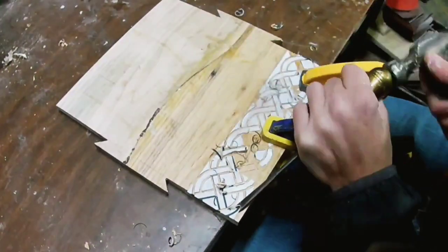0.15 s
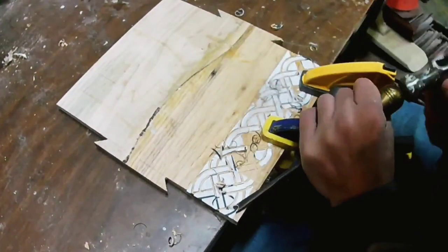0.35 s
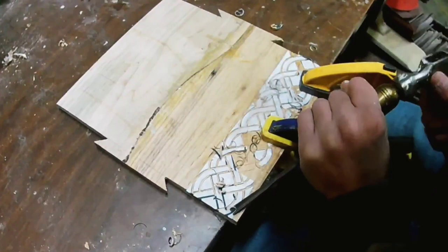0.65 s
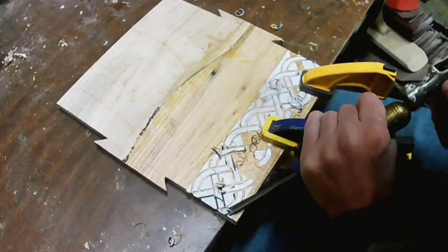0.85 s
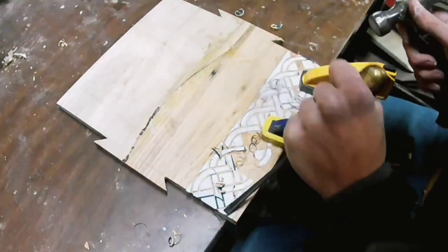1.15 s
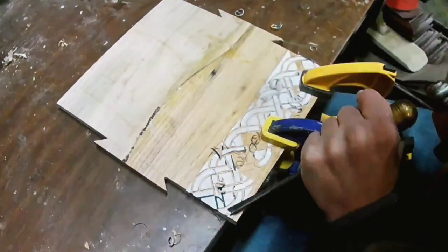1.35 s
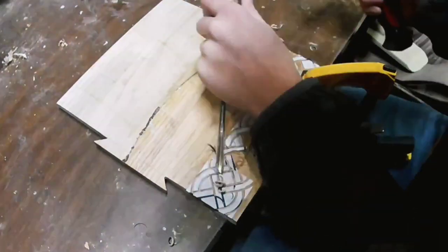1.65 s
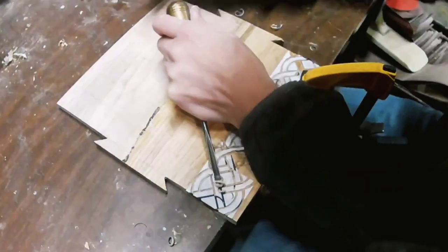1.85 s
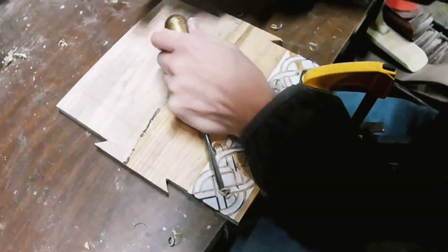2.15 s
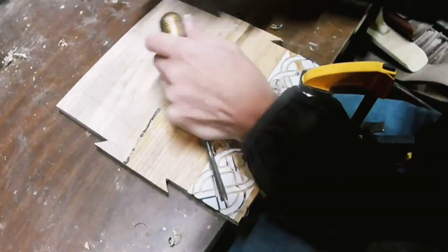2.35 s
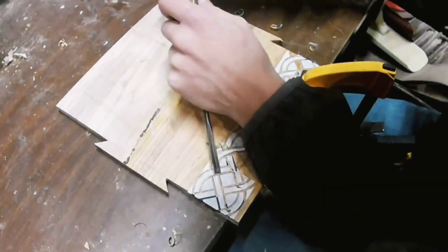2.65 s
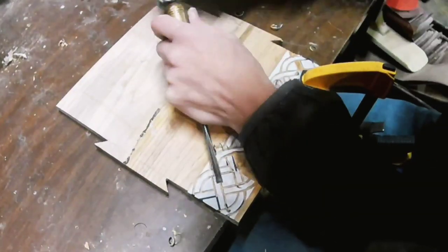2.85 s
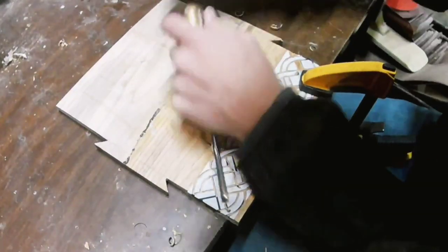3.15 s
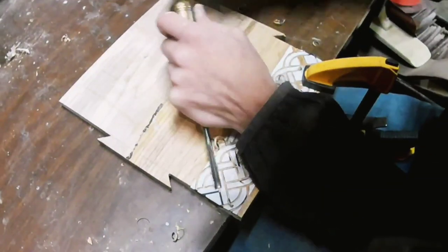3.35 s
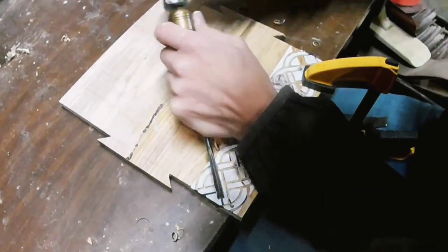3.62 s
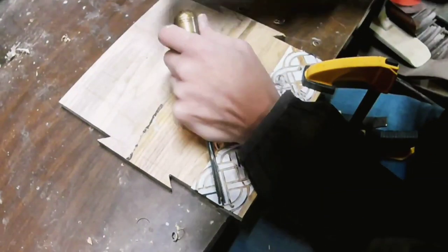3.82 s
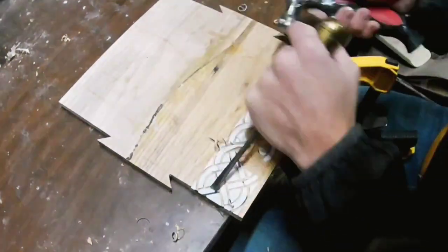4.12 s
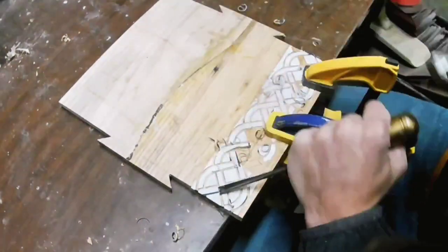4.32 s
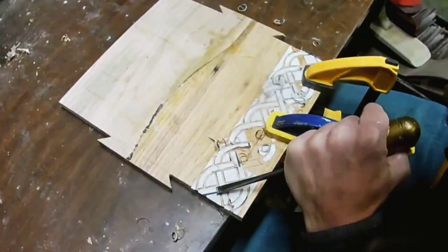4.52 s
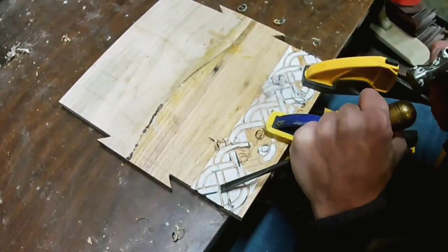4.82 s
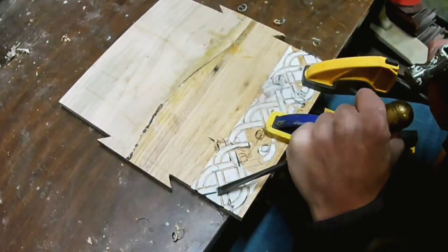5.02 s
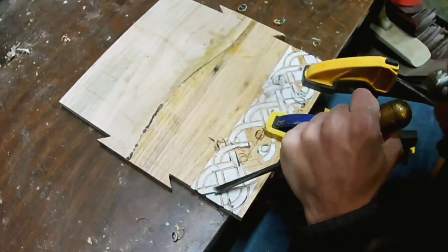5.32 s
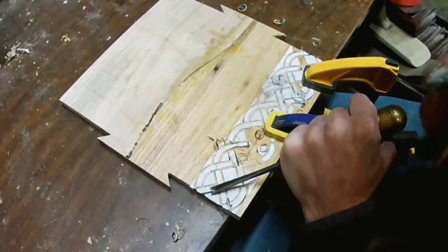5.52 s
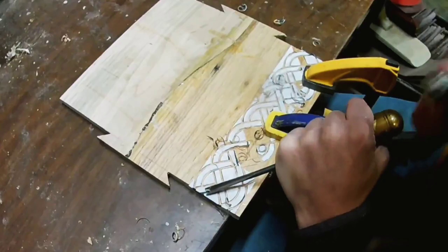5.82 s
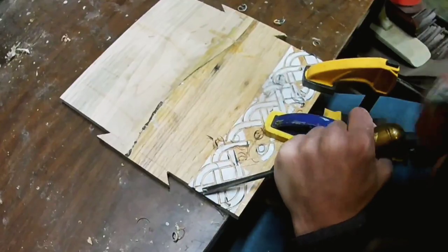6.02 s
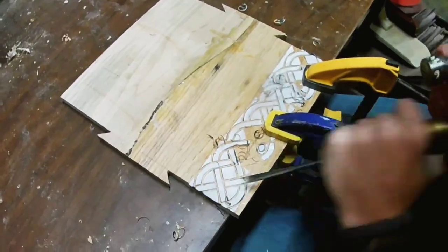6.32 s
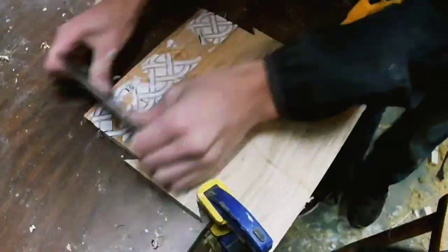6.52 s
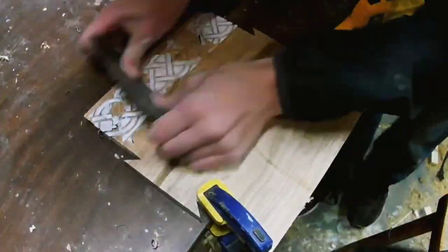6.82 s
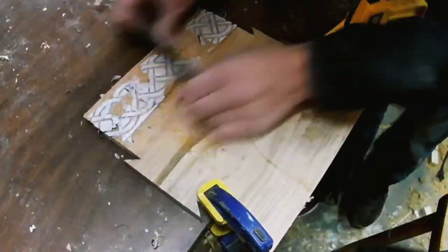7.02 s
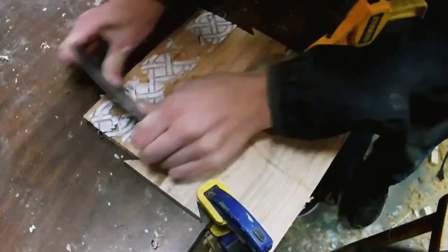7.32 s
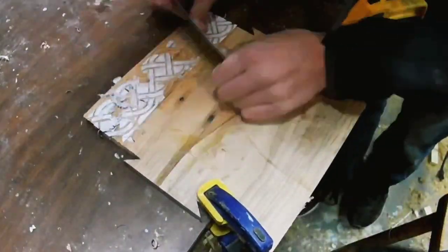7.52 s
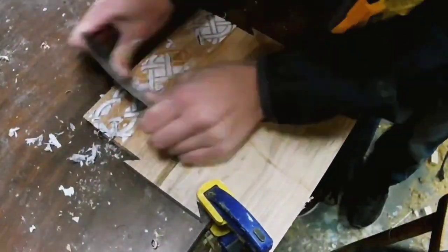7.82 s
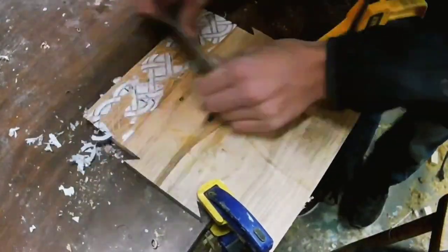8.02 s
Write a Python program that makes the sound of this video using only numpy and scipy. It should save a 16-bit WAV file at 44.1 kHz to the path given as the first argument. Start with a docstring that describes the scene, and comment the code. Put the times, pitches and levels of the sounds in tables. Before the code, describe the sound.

Dry, quiet wood carving recorded close and nearly mono. Clusters of irregular chisel taps knock and scratch at a wooden board, some barely audible, others sharp, with low thuds from the bench. Short gaps leave only dull room air. Later the tapping gives way to evenly repeated gouge pushes, each a crunchy bite followed by a thin, hissy rasp and crackling shaving. One huge blunt pop of air overloads the microphone before a few weak scrapes.

```python
"""Carving a board on a workbench

A hammer drives a chisel in quick runs of taps: the board clacks, the steel edge crunches, the bench booms. Then
a gouge is pushed by hand, biting and scraping, and a puff of air thumps the microphone. Bursts of snapping
fibres ring the resonances of board and edge; the bench is struck or rubbed. A faint room tail and steady air
noise surround the work."""
import sys
import numpy as np
from scipy import signal
from scipy.fft import rfft, irfft
from scipy.io import wavfile

SR = 44100
rng = np.random.default_rng(int(sys.argv[2]) if len(sys.argv) > 2 else 0)


def wav_record(signal):
    """Record a signal, one row per channel, as 16-bit PCM in the file named by sys.argv[1]."""
    frames = np.transpose(np.atleast_2d(signal))
    bounded = np.clip(frames, -1, 1)
    # unit amplitude maps onto the largest positive 16-bit level
    quanta = np.round(bounded * 32767).astype(np.int16)
    wavfile.write(sys.argv[1], SR, quanta)


N = 360297

# Hammer taps on the chisel: start_s, level_db (of the board's clack), cut_length_s
TAPS = [(0.015, -30, 0.0088), (0.047, -36, 0.0072), (0.074, -42.5, .008), (0.098, -31, 0.0052),
        (0.308, -29.5, 0.0048), (0.323, -44.5, .009), (0.377, -36.5, 0.0087), (0.448, -25, 0.0049),
        (0.482, -34.5, 0.0087), (0.539, -49, 0.0063), (0.578, -39, 0.016), (0.623, -32, 0.02),
        (0.673, -39, 0.022), (0.697, -31.5, 0.01), (0.726, -26.5, 0.0086), (0.76, -32, .007),
        (0.787, -39.5, .02), (0.891, -30.5, 0.0085), (0.929, -37, .008), (0.976, -29, .021),
        (1.026, -21, 0.0086), (1.097, -29.5, 0.0069), (1.251, -61.5, .01), (1.278, -51.5, 0.0074),
        (1.349, -56, 0.0028), (1.461, -39, 0.013), (1.483, -39.5, 0.0088), (1.511, -27, 0.021),
        (1.576, -40, 0.0054), (1.598, -38.5, 0.015), (1.955, -40, .008), (1.993, -36, 0.005),
        (2.097, -31.5, 0.0033), (2.13, -39.5, 0.009), (2.233, -41.5, 0.012), (2.271, -46, 0.0038),
        (2.396, -34, 0.012), (2.43, -40.5, 0.0048), (2.489, -40.5, 0.012), (2.53, -30, 0.012),
        (2.617, -30, 0.0059), (2.876, -42, 0.012), (2.978, -34.5, .008), (3.014, -43.5, 0.0097),
        (3.111, -32, 0.016), (3.165, -26.5, 0.0099), (3.215, -32, 0.0072), (3.256, -35, 0.0033),
        (3.321, -49.5, 0.011), (3.461, -36, 0.0098), (3.517, -29.5, 0.0087), (3.579, -35.5, 0.0062),
        (3.646, -39.5, 0.013), (3.69, -28, 0.012), (3.739, -26, 0.011), (3.801, -35, 0.013),
        (3.855, -23.5, 0.012), (3.899, -30, 0.017), (3.947, -24, .01), (4.031, -45, 0.019),
        (4.111, -25, 0.013), (4.221, -54.5, 0.019), (4.285, -55, .016), (4.489, -47, 0.016),
        (4.552, -38.5, .002), (4.6, -28.5, 0.011), (4.672, -28.5, 0.0059), (4.788, -56.5, 0.013),
        (5.184, -44.5, 0.0098), (5.35, -30, 0.0063), (5.398, -23, 0.005), (5.452, -32, .018),
        (5.512, -32.5, 0.014), (5.57, -31.5, .013), (5.618, -27.5, .018), (5.672, -22, 0.0078),
        (5.718, -19.5, 0.0065), (5.781, -29.5, 0.0045), (5.825, -29.5, 0.012), (5.901, -24.5, .013),
        (5.961, -27, 0.0097), (6.017, -26.5, 0.013), (6.07, -32, 0.016), (6.133, -24.5, 0.0069),
        (6.181, -27, 0.0095), (6.238, -30, 0.0038), (6.404, -55.5, 0.023)]
# Resonances of the clamped board: pitch_hz, width_hz, level_db (relative)
BOARD = [(407, 62, -26), (541.5, 122, -15.5), (780.5, 160, -13.5), (976.3, 120, -7), (1267.4, 115.7, 4),
         (1420, 220, -10), (1537, 120, -8), (1692, 430, -22), (1972, 120, -14.5), (2100, 420, -22.5),
         (2616, 140, -31.5)]
# Resonances of the steel edge in the fibres: pitch_hz, width_hz, level_db (relative)
EDGE = [(3246, 240, 1), (3490, 780, -3.5), (3730, 370, 2), (4450, 53, -7.5), (4470, 110, -12.5),
        (5265, 660, -18.5), (5870, 170, -21), (6400, 380, -28), (6700, 330, -30)]
# Resonances of the bench top: pitch_hz, width_hz, level_db (relative)
BENCH = [(55, 43, -28.5), (95.3, 26, 6.5), (130, 56, -6.5), (225, 64, -18.5), (345, 84, -21.5),
         (510, 130, -19.5)]
# Tone of the gouge's shallow slicing, added to the resonances: pitch_hz, change_db
SLICING = [(200, 14.5), (530, -5.5), (970, -1.5), (1270, -1.5), (1500, -1.5), (1700, 13), (2000, 0),
           (2700, 1.5), (3700, 8.5), (4300, 6.5), (5300, 3.5), (6400, -1), (10000, 5)]
# Tone of the workshop air: pitch_hz, level_db (relative, per Hz)
AIR = [(15, -43), (25, -7.5), (71, 0), (169, -6), (349, -8), (389, -11), (582, -16), (804, -17),
       (2490, -25), (2850, -28), (3930, -28), (5140, -34), (15500, -42.5)]
# How alike the air is on the left and right: pitch_hz, likeness (0 to 1)
AIR_LIKENESS = [(100, 1), (1500, 0.99), (4000, 1), (10000, 0.1)]
# Difference between the two microphone ports: pitch_hz, side_over_mid_db
PORTS = [(100, -41), (500, -35), (1300, -47.5), (2000, -35.5), (3700, -35.5), (6000, -10), (12000, -8)]
# Resonances of the shaving curling off the gouge: pitch_hz, width_hz, level_db (relative)
SHAVING = [(1794, 190, 20), (4214, 140, 20), (5280, 1400, 0.5), (5700, 210, -10), (6070, 300, 0.5),
           (6810, 210, -10)]
# Runs of hammering: start_s, end_s, chisel_pressure_db, low_mode_lift_db, slips_per_s
RUNS = [(-0.05, 0.113, -2, 0.5, 2), (0.247, 0.85, -1, 3.5, 12), (0.886, 1.109, -3.5, -4, 5),
        (1.424, 1.614, -8, -1.5, 10), (1.89, 2.649, 1, 1.5, 12), (2.874, 3.258, -2, -4.5, 7),
        (3.473, 4.018, 8, 0, 0.5), (4.485, 4.727, -9, -3.5, 0), (5.347, 6.281, 1.5, -1.5, 1.5)]
# Gouge strokes, a bite and then a slide: start_s, bite_level_db, bite_length_s, slide_level_db
STROKES = [(6.58, -32, 0.0077, -37), (6.761, -34, .007, -43), (6.923, -36, .016, -39.5),
           (7.043, -32, 0.021, -40.5), (7.164, -27.5, 0.024, -38), (7.288, -26.5, 0.022, -38),
           (7.412, -18, 0.02, -38), (7.532, -26.5, 0.019, -39.5), (7.645, -28, 0.019, -39.5),
           (7.788, -48, 0.023, -48), (7.923, -44, 0.0095, -50.5), (8.06, -40.5, 0.00414, -50)]
# Chips snapping off: start_s, level_db (of the board's part)
CHIPS = [(2.328, -43.5), (2.399, -34.5), (2.431, -37.5), (3.582, -35.5), (6.606, -40), (6.811, -36.5),
         (7.481, -31)]
# A tool resting on the wood damps the main ring and brings out the rest: pitch_hz, change_db
RESTING_TOOL = [(250, -0.5), (550, 7.5), (950, 1.5), (1255, -3.5), (1550, -2), (2050, 4), (3700, -2),
                (5500, 4.5)]
# The sliding gouge sounds thinner and hissier than its bite: pitch_hz, change_db
SLIDING_GOUGE = [(200, 15.5), (530, -3.5), (950, -4.5), (1270, -3), (1500, -6.5), (1750, 1), (2100, 3),
                 (2700, 1.5), (3700, 16.5), (4300, 8), (5300, 7), (6400, -2), (10000, 11)]

RING = 8192  # samples in one short sound
RING_HZ = np.fft.rfftfreq(RING, 1 / SR)
RING_S = np.arange(RING) / SR
TIME = np.arange(N) / SR
CUTOFF_HZ, AIR_DB, ROOM_T60_S, PUFF_S = 15800, -67, .2, 7.7488

# The hand leans in as a run starts and eases off as it ends; between runs the chisel only rests
LEAN_IN_S, EASE_OFF_S, EASED_DB, RESTING_DB = 0.054, 0.013, 12.5, -22
# Pressure makes the chisel rub louder
RUB_DB, RUB_PER_DB = -55, 0.59
SLIP_DB, SLIP_SPREAD_DB, SLIP_S = -43.5, 2.5, .01
LOW_MODES_HZ = 1090
# Pressure drives the edge through more fibres; a glancing tap scratches more for its weight than a square one
CRUNCH_DB, CRUNCH_PER_DB, SQUARE_TAP_DB, GLANCING_SHARE = -24.5, 0.41, -30, .15
BOOM_DB = -40  # bench boom before pressure is added
# A long cut takes longer to reach its full force
SINK_S, SINK_PER_LENGTH = 0.0019, 0.09

# A louder bite is a deeper one and lifts the low modes
BITE_CRUNCH_DB, SHALLOW_BITE_DB, DEPTH_PER_DB = -26.5, -24.5, 1
# The slide begins after so many bite lengths and lasts until the stroke ends; the hands settle near that end
SLIDE_AFTER_BITES, STROKE_S, SETTLE_S, SETTLE_DB = 1.72, 0.085, 0.081, -8
# The gouge's back rubs the wood from the bite on, this far under the slide
BACK_RUB_S, BACK_RUB_DB = .12, -11


def from_db(db):
    """Turn decibels into a gain."""
    return 10 ** (np.asarray(db) / 20)


def rms_one(x):
    """Scale a sound to an average strength (rms) of 1."""
    return x / np.sqrt(np.mean(x ** 2) + 1e-20)


def burst(x, db, span):
    """Scale a short sound so that its energy, spread over span seconds, has this level."""
    return from_db(db) * x / np.sqrt(np.sum(x ** 2) / (span * SR) + 1e-20)


def at_hz(points, hz):
    """Read a table between its points, on a log-frequency axis."""
    f, value = np.transpose(points)
    return np.interp(np.log(hz + 1), np.log(f), value)


def add(out, s, x):
    """Mix x into out from time s on."""
    i = max(round(s * SR), 0)
    out[i:i + len(x)] += x[:N - i]


def both_sides(side):
    """Give the left the side signal and the right its mirror image."""
    return side * np.array([[1], [-1]])


def body(modes, vary_db=0, colour_db=0):
    """Make the ring of an object from its resonances; each contact may weight them a little differently."""
    hz, width, db = np.transpose(modes)[:, :, None]
    weights = from_db(db + vary_db * rng.standard_normal(db.shape))
    peaks = weights / (1 + (2 * (RING_HZ - hz) / width) ** 2)
    gain = np.sqrt(np.sum(peaks ** 2, axis=0)) * from_db(colour_db)
    cepstrum = irfft(np.log(gain + 1e-9))
    cepstrum[1:RING // 2] *= 2  # folding the cepstrum gives minimum phase: the ring starts at once
    cepstrum[RING // 2 + 1:] = 0
    return irfft(np.exp(rfft(cepstrum)))


def excite(force, response):
    """Let a force ring through an object's response (convolution)."""
    return signal.fftconvolve(force, response)[:len(force)]


def fibres(per_s, spread_db, size):
    """Snap wood fibres at random moments with uneven strengths; rms 1."""
    snaps = rng.random(size) < per_s / SR
    signs = rng.choice([-1, 1], size)
    return rms_one(snaps * signs * from_db(spread_db * rng.standard_normal(size)))


def cut_force(length, tearing, firm_s):
    """A first contact, then fibres tearing while the edge advances; a longer cut tears more."""
    length = max(length, .002)
    tear = fibres(per_s=5000, spread_db=0.5, size=RING) * np.exp(-(RING_S / length) ** 4)
    tear = tear / np.sqrt(np.sum(tear ** 2) + 1e-20)
    force = tear * tearing * (length / firm_s) ** 2
    force[0] += 1
    return force


def swell(rise_s):
    """The edge sinks in over a moment instead of striking at once."""
    return 1 - np.exp(-(RING_S / rise_s) ** 3)


def around_cut(response, db, length, linger_s):
    """Loose fibres rustle around a cut: noise swells and fades through a response."""
    rustle = rng.standard_normal(RING) * RING_S * np.exp(-(RING_S / (length + linger_s)) ** 2)
    return burst(excite(rustle, response), db, span=0.054)


def splinters(db, length, spray_hz=11000, spray_width_hz=14000):
    """A bright spray of fine splinters: noise through one very broad, high resonance."""
    return around_cut(body([(spray_hz, spray_width_hz, 0)]), db, length, linger_s=0.014)


def sliding(strokes, colour_db, edge_db, boom_db, ramp_s, judder_db, judder_per_s, snaps_per_s):
    """Steel dragged over wood: dense fibre snaps under a juddering pressure ring board, edge and bench."""
    pressure = 0
    for start, end, db in strokes:
        inside_s = np.minimum(TIME - start, end - TIME)
        ease = np.sin(np.pi / 2 * np.clip(inside_s / ramp_s + .5, 0, 1)) ** 2
        pressure = pressure + from_db(db) * ease
    judder = np.interp(TIME * judder_per_s, np.arange(4096), rng.standard_normal(4096))
    force = fibres(per_s=snaps_per_s, spread_db=5.5, size=N) * from_db(judder_db * judder)
    parts = [(BOARD, 0), (EDGE, edge_db), (BENCH, boom_db)]
    response = sum(burst(body(modes, colour_db=colour_db), db, span=1 / SR) for modes, db in parts)
    return excite(rms_one(force) * pressure, response)


def air():
    """Steady dull room noise with a faint hiss: shaped noise, partly shared by left and right."""
    hz = np.fft.rfftfreq(N, 1 / SR)
    alike = np.clip(at_hz(AIR_LIKENESS, hz), 0, 1)
    mid, side = rfft(rng.standard_normal((2, N))) * from_db(at_hz(AIR, hz))
    spectrum = np.sqrt(1 + alike) * mid + both_sides(np.sqrt(1 - alike) * side)
    return from_db(AIR_DB) * rms_one(irfft(spectrum, N))


def pressure_db(s):
    """How hard the chisel is pressed into its groove at time s."""
    def eased(inside_s, ramp_s):
        return EASED_DB * np.exp(min(-inside_s / ramp_s, 2))

    pressed = [db - eased(s - start, LEAN_IN_S) - eased(end - s, EASE_OFF_S)
               for start, end, db, _, _ in RUNS]
    return max(RESTING_DB, *pressed)


def low_lift_db(s):
    """Each run cuts at another spot and angle, stirring the board's low modes more or less."""
    start, end, _, lift_db, _ = np.transpose(RUNS)
    nearest = np.argmin(np.maximum(start - s, s - end))
    return lift_db[nearest] / (1 + (RING_HZ / LOW_MODES_HZ) ** 12)


def chisel_rubs():
    """The chisel rubs in its groove all through a run, louder under pressure."""
    runs = [(start, end, RUB_DB + RUB_PER_DB * db) for start, end, db, _, _ in RUNS]
    return sliding(runs, at_hz(RESTING_TOOL, RING_HZ), edge_db=-14.5, boom_db=2, ramp_s=.02,
                   judder_db=4.0, judder_per_s=78, snaps_per_s=2400)


def slips():
    """Within a run the edge also slips on through the grain in weak, irregular jerks: rows like TAPS."""
    rows = []
    for start, end, _, _, per_s in RUNS:
        slots = max(round((end - start) * per_s), 0)
        for k, (place, strength) in enumerate(rng.uniform(-1, 1, (slots, 2))):
            s = start + (end - start - SLIP_S) * (k + .5 + place / 2) / slots
            rows.append((s, SLIP_DB + SLIP_SPREAD_DB * strength, SLIP_S))
    return rows


def hammer_taps():
    """The chisel scuffs into its groove, the edge cracks, the board clacks, and the heavy bench follows."""
    edge_lead_s, board_lead_s, boom_lag_s, scuff_lead_share = .002, .001, 0.0025, .4
    spray_db, scuff_db, edge_scuff_db, boom_most_db = -23, -14, -7, 5
    out = np.zeros(N)
    for s, db, length in TAPS + slips():
        pressed_db = pressure_db(s)
        sinking = swell(SINK_S + SINK_PER_LENGTH * length)
        glancing_db = GLANCING_SHARE * (SQUARE_TAP_DB - db)
        crunch_db = db + CRUNCH_DB + CRUNCH_PER_DB * pressed_db + glancing_db
        # pressure couples the blow into the bench, but a weak tap cannot shake it much
        bench_db = min(BOOM_DB + pressed_db, db + boom_most_db)
        # hard blows stir the upper board modes
        hard_db = 0.53 * max(db + 35, 0) * np.exp(-((RING_HZ - 1480) / 170) ** 2)
        board = body(BOARD, vary_db=2.2, colour_db=hard_db + low_lift_db(s))
        edge = body(EDGE, vary_db=3.0)
        clack = excite(cut_force(length, tearing=0.87, firm_s=0.0059), board) * sinking
        crunch = excite(cut_force(length + 0.0055, tearing=0.94, firm_s=0.0034), edge) * sinking
        scuff = around_cut(board, db + scuff_db, length, linger_s=0.0049)
        edge_scuff = around_cut(edge, crunch_db + edge_scuff_db, length, linger_s=0.0048)
        spray = splinters(crunch_db + spray_db, length)
        boom = body(BENCH, vary_db=4.0)
        add(out, s - board_lead_s, burst(clack, db, span=0.022))
        add(out, s - edge_lead_s, burst(crunch, crunch_db, span=0.047))
        add(out, s - scuff_lead_share * length, scuff + edge_scuff + spray)
        add(out, s + boom_lag_s, burst(boom, bench_db, span=0.02))
    return out


def chip_snaps(length_s=0.0096, crunch_db=-9):
    """A chip breaks away with a short, bright crack: one tearing force rings board and edge."""
    out, slicing = np.zeros(N), at_hz(SLICING, RING_HZ)
    for s, db in CHIPS:
        force = cut_force(length_s, tearing=0.97, firm_s=0.0043)
        for modes, part_db in (BOARD, 0), (EDGE, crunch_db):
            crack = excite(force, body(modes, colour_db=slicing))
            add(out, s, burst(crack, db + part_db, span=0.015))
    return out


def handling(at_s=6.26, width_s=0.037, db=-42, top_hz=65):
    """A brief low rumble as the microphone's stand is nudged: low noise that swells and fades."""
    low_band = signal.butter(2, [20, top_hz], "band", fs=SR, output="sos")
    rumble = rms_one(signal.sosfilt(low_band, rng.standard_normal(N)))
    return from_db(db) * rumble * np.exp(-abs(TIME - at_s) / width_s)


def gouge_bites():
    """Pushed by hand, the gouge catches and tears a chip; a deep bite shakes the low modes."""
    spray_db, deep_hz, deep_width_hz, deep_db, rise_share = -24, 850, 220, 4, 0.19
    out = np.zeros(N)
    low_modes = 1 / (1 + ((RING_HZ - deep_hz) / deep_width_hz) ** 4)
    slicing = at_hz(SLICING, RING_HZ)
    for s, db, length, _ in STROKES:
        rise = rise_share * length
        depth_db = DEPTH_PER_DB * (db - SHALLOW_BITE_DB)
        crunch_db = db + BITE_CRUNCH_DB
        board = body(BOARD, vary_db=2.0, colour_db=slicing + (depth_db + deep_db) * low_modes)
        edge = body(EDGE, vary_db=2.0, colour_db=slicing)
        clack = excite(cut_force(length + rise / 2, tearing=0.93, firm_s=0.026), board) * swell(rise)
        crunch = excite(cut_force(length + rise, tearing=1.4, firm_s=0.0045), edge) * swell(rise)
        scuff = around_cut(board, db - 14, length, linger_s=length)
        spray = splinters(crunch_db + spray_db, length)
        add(out, s - rise / 2, burst(clack, db, span=0.031) + burst(crunch, crunch_db, span=0.083))
        add(out, s - length / 2, scuff + spray)
    return out


def slides():
    """When the gouge slides through the fibres: rows of start_s, end_s, level_db."""
    return [(s + SLIDE_AFTER_BITES * length, s + STROKE_S, db) for s, _, length, db in STROKES]


def gouge_slides():
    """The edge rasps through the fibres after each bite while the gouge's back rubs the wood."""
    backs = [(s, s + BACK_RUB_S, db + BACK_RUB_DB) for s, _, _, db in STROKES]
    rub = sliding(backs, at_hz(RESTING_TOOL, RING_HZ), edge_db=-11.5, boom_db=-13, ramp_s=0.022,
                  judder_db=3, judder_per_s=50, snaps_per_s=2400)
    rasp = sliding(slides(), at_hz(SLIDING_GOUGE, RING_HZ), edge_db=-9, boom_db=-15, ramp_s=0.014,
                   judder_db=4.0, judder_per_s=74, snaps_per_s=3400)
    return rub + rasp


def shaving(over_scrape_db=-11):
    """The shaving crackles as it curls off the gouge, strongest in the middle of each slide."""
    arch = 0
    for start, end, level in slides():
        progress = np.clip((TIME - start) / (end - start), 0, 1)
        arch = arch + from_db(level) * np.sin(np.pi * progress)
    crackle = fibres(per_s=1200, spread_db=5, size=N)
    return from_db(over_scrape_db) * arch * rms_one(excite(crackle, body(SHAVING)))


def bench_bumps():
    """In each gouge stroke the shifting weight makes the lowest bench modes boom softly."""
    out = np.zeros(N)
    for s, _, _, db in STROKES:
        add(out, s + SETTLE_S, burst(body(BENCH[:3]), db + SETTLE_DB, span=0.014))
    return out


def air_puff():
    """A puff hits the microphone: suction swells, flips to pressure and sinks back in eddies."""
    # these levels drive the diaphragm, before its travel is limited
    suction_db, push_db, rebound_db, eddy_db = 3.0, 19.0, -31, -26
    rise_s, fall_s, rebound_s, eddy_hz, snap_db = 0.0035, 0.002, .022, 600, -40
    t = TIME - PUFF_S
    suction = -from_db(suction_db) * np.exp(-abs(t) / rise_s)
    push = from_db(push_db) * np.exp(-abs(t) / fall_s)
    wave = np.where(t < 0, suction, push)
    rebound = from_db(rebound_db) * np.exp(-((t - rebound_s) / 0.0077) ** 2)
    low_pass = signal.butter(2, eddy_hz, fs=SR, output="sos")
    eddies = rms_one(signal.sosfilt(low_pass, rng.standard_normal(N)))
    eddies *= from_db(eddy_db) * np.exp(-((t - .004) / 0.011) ** 2)
    # the diaphragm runs out of travel and needs a moment to swing across
    travel = .92 * np.tanh(wave + rebound + eddies)
    swing = np.hanning(29)
    smoothed = np.convolve(travel, swing / swing.sum(), "same")
    return smoothed + from_db(snap_db) * travel  # a trace of the sharp flip remains


def two_ports(x):
    """The ports sit close together, so mostly the treble reaches them slightly out of step."""
    side_gain = from_db(at_hz(PORTS, np.fft.rfftfreq(N, 1 / SR)))
    side = irfft(1j * side_gain * rfft(x), N)  # 1j shifts the phase by a quarter turn
    return x + both_sides(side)


def workshop(x, t60, wet_db, wide_db):
    """A short, faint tail from a cluttered room: fading noise, a little different on each side."""
    decay = from_db(-60 * RING_S / t60) * (RING_S > .006)
    mid, side = [excite(x, burst(rng.standard_normal(RING) * decay, wet_db, span=1 / SR)) for _ in range(2)]
    return mid + from_db(wide_db) * both_sides(side)


def scene():
    """Mix the work, straight under the microphone, with its room tail, the rumble, the puff and the air."""
    work = hammer_taps() + chisel_rubs() + gouge_bites() + gouge_slides()
    work = work + chip_snaps() + shaving() + bench_bumps()
    tail = workshop(work, t60=ROOM_T60_S, wet_db=-29, wide_db=-26.5)
    return two_ports(work) + tail + handling() + air_puff() + air()


def record(dry):
    """A steep low-pass filter cuts off the highest treble."""
    low_pass = signal.ellip(10, .1, 80, CUTOFF_HZ, fs=SR, output="sos")
    return signal.sosfilt(low_pass, dry)


dry = scene()
out = record(dry)
wav_record(out)
```